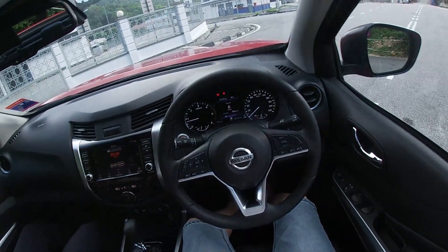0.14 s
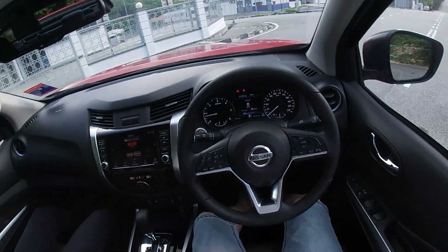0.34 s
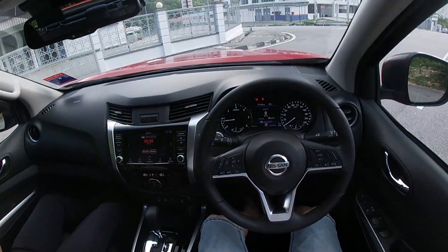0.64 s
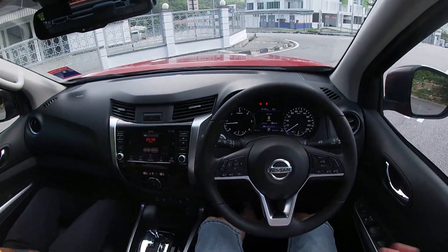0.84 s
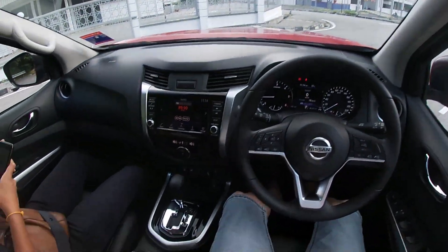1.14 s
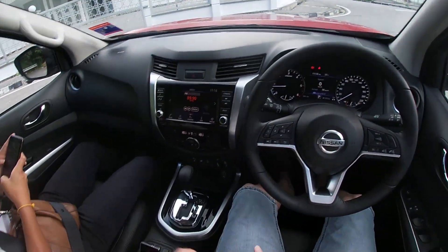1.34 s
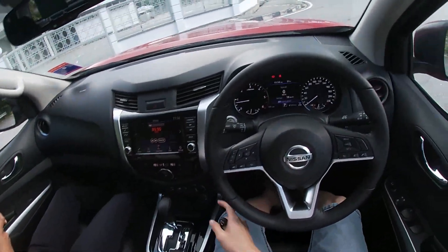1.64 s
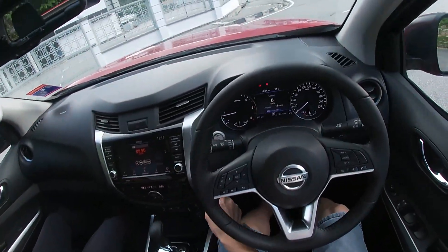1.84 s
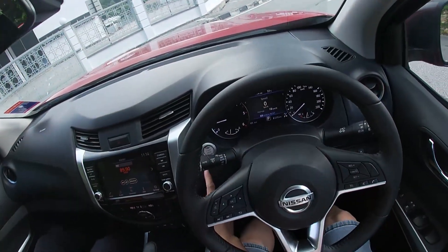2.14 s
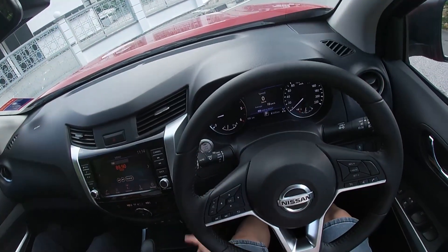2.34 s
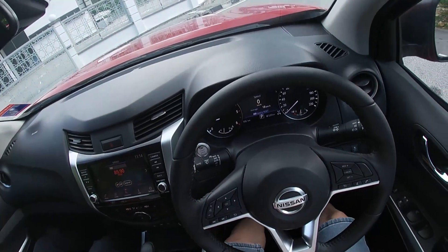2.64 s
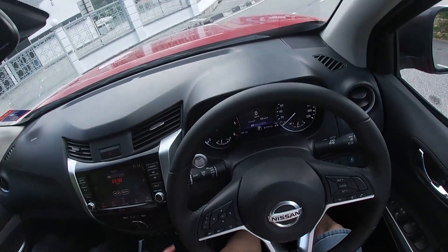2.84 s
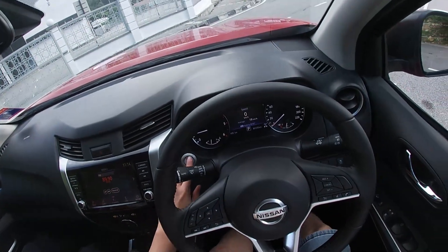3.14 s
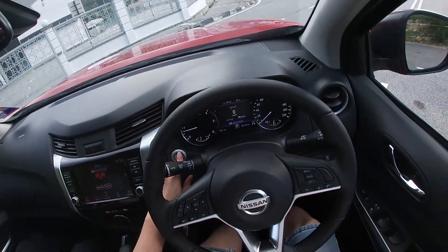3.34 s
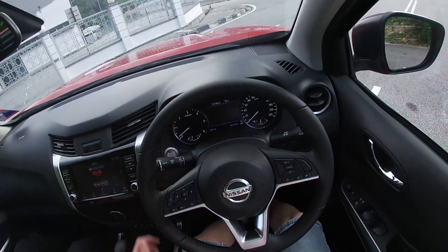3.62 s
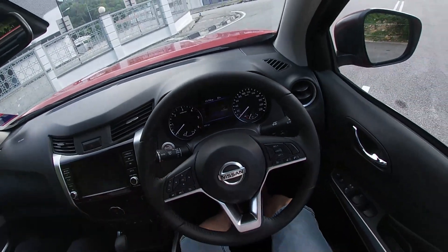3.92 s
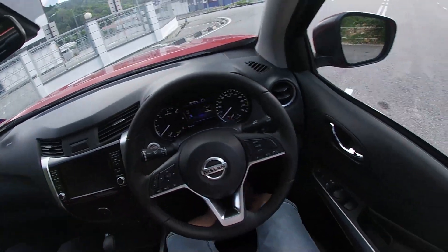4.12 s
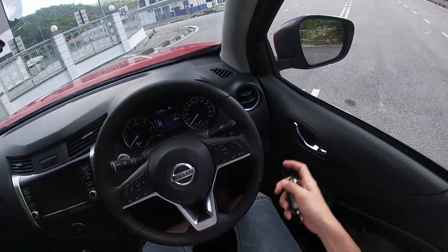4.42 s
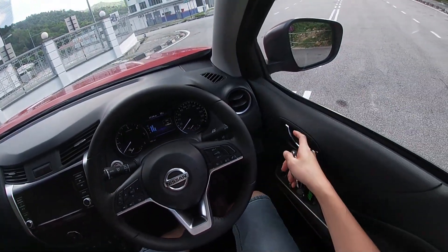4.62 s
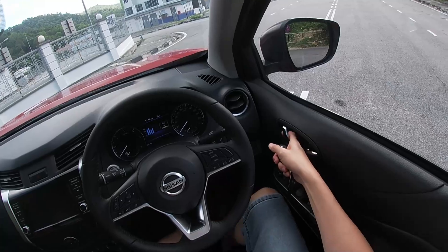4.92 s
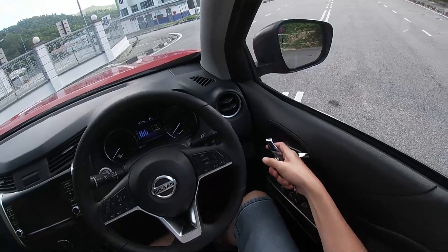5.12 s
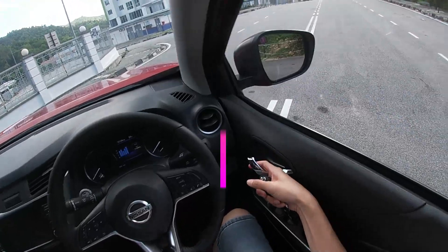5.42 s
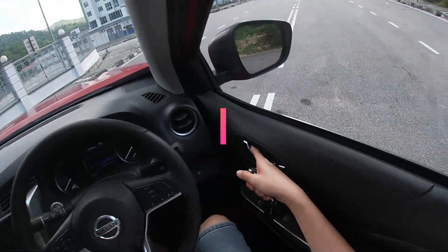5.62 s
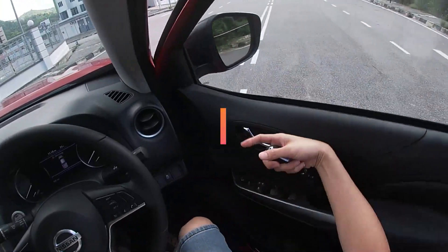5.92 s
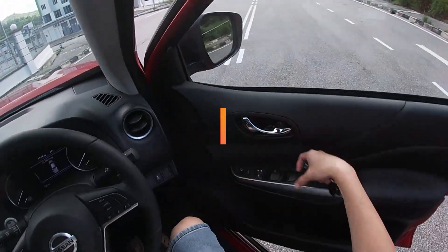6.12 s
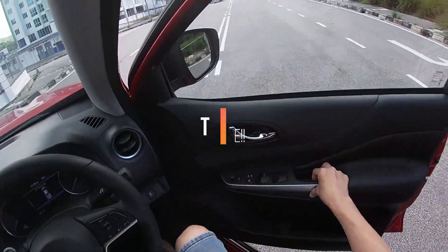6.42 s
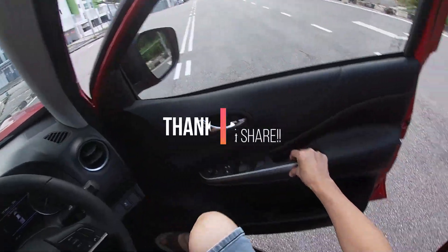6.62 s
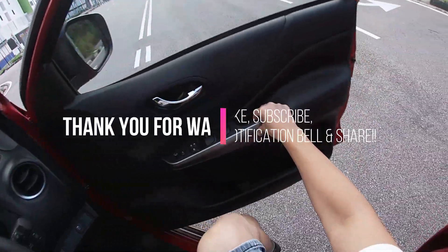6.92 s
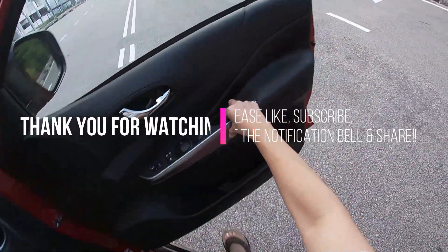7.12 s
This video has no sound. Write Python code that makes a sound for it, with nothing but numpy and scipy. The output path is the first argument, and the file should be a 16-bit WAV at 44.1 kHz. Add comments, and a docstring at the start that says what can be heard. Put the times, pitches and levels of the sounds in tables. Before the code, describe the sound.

From the driver's seat in a small, dry truck cabin, a four-cylinder diesel idles evenly, a deep boom pulsing about 25 times a second with soft muffled knock. Hiss and rumble rise and fall. Clicks come at once, with a tiny plastic creak at 0.15 s; stronger knocks and clicks cluster at 0.8-1.2 s, small ticks until 1.75. The boom softens from 1.6 to 2.2 s; a dull thud falls at 2.2. Clicks at 3.35 and 3.6 precede a lock clunk and brief whirr near 3.65. The engine cuts at 3.75, slows and shudders out by about 4.5. Quiet rubs and ticks follow. At 5.27 the latch releases with a heavy low thump; a short groan at 5.6, then rapid door thuds at 5.75-5.95. From 6.1 street noise opens and grows, with faint scrapes, a click and knock around 6.35, low wind gusts from 6.75 and a tiny falling chirp at 6.9.

```python
"""Inside a parked pickup a four-cylinder diesel idles amid clicks, dull knocks and short rubbing noises.
The engine is switched off, the locks spring open and the crank rocks to rest.
The door latch lets go, the door bumps free of its seal and the street air comes in.
The engine is a sum of firing orders with pulsed noise; struck parts are decaying modes with noise bursts;
creaks are stick-slip pulses in resonances or trembling tones, and rubs and air are coloured noise."""
import sys
import numpy as np
from scipy import signal
from scipy.fft import rfft, irfft, next_fast_len
from scipy.io import wavfile
from scipy.ndimage import uniform_filter1d

SR = 44100
rng = np.random.default_rng(int(sys.argv[2]) if len(sys.argv) > 2 else 0)


def log_audio(samples):
    """Write samples as a 16-bit WAV file to the path given in sys.argv[1]."""
    # one column per channel
    frames = np.atleast_2d(samples).T
    # limit to full scale, then quantise
    limited = np.clip(frames, -1, 1)
    pcm = np.round(limited * 32767).astype(np.int16)
    wavfile.write(sys.argv[1], SR, pcm)


N = 320607
T = np.arange(N) / SR
HIT_T = T[:SR // 2]  # time since a blow, s


def undb(db):
    """Logarithmic level: decibels to amplitude gain."""
    return 10 ** (np.asarray(db) / 20)


def unit(x):
    """Power normalisation: scale to rms 1."""
    return x / np.sqrt(np.mean(x ** 2))


def peak(x):
    """Peak normalisation: scale to peak 1."""
    return x / np.abs(x).max()


def colour(x, points):
    """Spectral shaping: filter by (Hz, dB) points joined along log frequency."""
    hz, db = np.transpose(points)
    size = next_fast_len(len(x))
    f = np.maximum(np.fft.rfftfreq(size, 1 / SR), 1)
    gain = undb(np.interp(np.log(f), np.log(hz), db))
    return irfft(rfft(x, size) * gain, size)[:len(x)]


def noise(points, size=N):
    """Random excitation: coloured noise of rms 1, so only the shape of the spectrum counts."""
    return unit(colour(rng.standard_normal(size), points))


def resonate(x, hz, width_hz):
    """Simple resonance: one second-order peak, gain 1 at its centre."""
    return signal.lfilter(*signal.iirpeak(min(hz, SR / 3), hz / width_hz, fs=SR), x)


def walk(rate):
    """Random modulation: new values at this rate in Hz joined by straight lines, rms near 1.4."""
    k = int(SR / rate)
    steps = np.repeat(rng.standard_normal(N // k + 1), k)[:N]
    return 1.7 * uniform_filter1d(steps, k)


def ramp(s, takes_s):
    """Linear transition: a straight rise from 0 to 1 that starts at time s."""
    return np.clip((T - s) / max(takes_s, .001), 0, 1)


def swell(s, length, attack_s, release_s):
    """Amplitude envelope: attack, hold until the length is over, release."""
    return ramp(s, attack_s) * (1 - ramp(s + length, release_s))


def fade(t60):
    """Exponential decay: the level falls 60 dB in t60 seconds."""
    return np.exp(-np.log(1000) * HIT_T / max(t60, .003))


def add(out, s, x):
    """Superposition: mix a sound in at time s."""
    i = max(int(s * SR), 0)
    out[i:i + len(x)] += x[:N - i]


# Crank speed. Each row: time in seconds, firing rate in Hz.
CRANK = [(0, 25.41), (1.2, 25.32), (2.4, 25.23), (3.72, 25.24), (3.89, 22.4), (3.98, 17), (4.6, 14)]
# Idle boom at firing orders 1 to 3. Each row: level in dB, change once the driver leans forward in dB.
BOOM = [(-36, -2), (-25, -6), (-38, 1.5)]
# Weaker firing orders. Each row: multiple of the firing rate, level in dB.
ORDERS = [(1.5, -49.5), (4, -46), (4.5, -55), (5, -55), (5.5, -56.5), (6, -52.5), (6.5, -57), (7, -48),
          (8, -58), (9, -58.5), (11, -64), (12, -62.5), (15, -65.5), (20, -64), (22, -63), (25, -69.5),
          (29, -66), (32, -69.5)]
# Diesel knock heard through the bulkhead. Each row: frequency in Hz, relative level in dB per Hz.
CLATTER = [(30, 2), (110, -2), (180, -4.5), (270, -9.5), (450, -13.5), (620, -13.5), (900, -23.5),
           (1250, -25), (1450, -26), (2500, -37.5), (5000, -43)]
LEAN_S, LEAN_TAKES_S = 1.59, 0.66  # the driver leans towards the start button
KEY_OFF_S, CUT_TAKES_S, COAST_DB = 3.74, 0.045, -12  # the fuel is cut and the engine coasts
STALL_S, STALL_DB_PER_S = 4.43, 86.5  # the last compression; the shaking dies away
FIRST_FIRING_S = .0266
STROKE_SCATTER_DB = 0.57  # per unit of wander: no two strokes weigh quite the same
WHINE_ORDER = 49  # gear whine, as a multiple of the firing rate
WHINE_DB, WHINE_FLUTTER_HZ = -65, 40  # backlash roughens the whine


def engine(knock_db=-42.5, scatter_db=-0.5):
    """Harmonic excitation: firings shake the cabin at multiples of their rate, with pulsed knock and gear whine."""
    s, hz = np.transpose(CRANK)
    rate = np.interp(T, s, hz)
    coast_db = COAST_DB * ramp(KEY_OFF_S, CUT_TAKES_S)
    effort = undb(coast_db - STALL_DB_PER_S * np.maximum(T - STALL_S, 0))
    lean = ramp(LEAN_S, LEAN_TAKES_S)
    angle = 2 * np.pi * (np.cumsum(rate) / SR - rate[0] * FIRST_FIRING_S)
    lurch = angle + 0.04 * walk(12.0)  # the block rocks unevenly on its mounts

    boom, drone = np.zeros(N), np.zeros(N)
    for order, (db, lean_db) in enumerate(BOOM, 1):
        level = undb(db + lean_db * lean + STROKE_SCATTER_DB * walk(25))
        boom -= level * np.sin(order * lurch)
    for order, db in ORDERS:
        drone += undb(db + 2 * walk(9)) * np.cos(order * angle + rng.uniform(0, 2 * np.pi))

    gate = unit(np.exp(.35 * np.cos(angle)) * undb(scatter_db * walk(25)))  # swells at each firing
    knock = undb(knock_db) * gate * noise(CLATTER)
    flutter = walk(WHINE_FLUTTER_HZ) + 1j * walk(WHINE_FLUTTER_HZ)
    whine = undb(WHINE_DB) * unit(np.real(flutter * np.exp(1j * WHINE_ORDER * angle)))
    return effort * (np.sqrt(2) * (boom + drone) + knock + whine)  # sqrt(2): sine levels are rms


# Stretches of louder hiss and low rumble. Each row: start in seconds, length in seconds, hiss in dB,
# rumble in dB.
SURGES = [(0.104, 0.52, -54, -42.5), (0.726, 0.4, -50.5, -46), (1.298, 1.09, -53.5, -65),
          (2.532, 0.52, -48.5, -65), (3.12, 0.67, -60.5, -47), (3.866, 0.74, -58, -46.5),
          (4.668, 0.52, -54, -48.5), (5.028, 0.49, -69, -37.5), (5.62, 0.4, -57, -39)]
# Spectrum of hiss, also used for short noises and the cabin's tail. Each row: frequency in Hz,
# relative level in dB per Hz.
HISS_COLOUR = [(200, 7), (700, 6), (1500, 2.5), (2600, 2), (4300, -0.5), (6000, 1), (7400, -1.5),
               (10000, -1), (15000, 3)]
# Spectrum of low rumble, also used for wind. Each row: frequency in Hz, relative level in dB per Hz.
RUMBLE_COLOUR = [(15, 0), (35, -7), (85, 3), (130, -2), (190, -4), (300, -16.5), (600, -30.5), (1500, -57)]
SURGE_ATTACK_S, SURGE_RELEASE_S = 0.054, 0.11
FLOOR_HISS_DB, FLOOR_RUMBLE_DB = -61.5, -50.5  # the closed cabin between the louder stretches


def cabin_noise(uneven_db=0.67, flicker_db=0.5):
    """Addition of powers: over a faint floor, the hiss and rumble rise and fall together."""
    hiss, rumble = undb(FLOOR_HISS_DB), undb(FLOOR_RUMBLE_DB)
    for s, length, hiss_db, rumble_db in SURGES:
        surge = swell(s, length, SURGE_ATTACK_S, SURGE_RELEASE_S)
        hiss = np.hypot(hiss, undb(hiss_db) * surge)
        rumble = np.hypot(rumble, undb(rumble_db) * surge)
    unevenness = undb(uneven_db * walk(8.8) + flicker_db * walk(60))
    return hiss * unevenness * noise(HISS_COLOUR) + rumble * noise(RUMBLE_COLOUR)


# Modes of the plastic catches. Each row: frequency in Hz, level in dB, t60 in seconds.
CATCH = [(434, -2.5, .07), (700, -13.5, 0.024), (883, 4, 0.024), (1009, 3.5, 0.023), (1228, -4, .04),
         (1348, 0.5, 0.038), (1541, 2.5, 0.031), (1800, -6, 0.042), (2110, -0.5, 0.029), (2588, -2, 0.057),
         (3085, 1, 0.042), (3785, -4, 0.034), (4600, 1, .045), (6560, 3.5, .04)]


def catch(body_hz, focus_db):
    """Modal vibration: a plastic catch rings, losing focus_db per octave away from its own pitch."""
    tone = np.zeros(len(HIT_T))
    for hz, db, t60 in CATCH:
        level = undb(db - focus_db * abs(np.log2(hz / body_hz)))
        detuned_hz = hz * (1 + 0.014 * rng.standard_normal())
        phase = rng.uniform(0, 2 * np.pi)
        tone += level * fade(t60) * np.sin(2 * np.pi * detuned_hz * HIT_T + phase)
    return peak(tone)


# Sharp clicks of switches and catches. Each row: start in seconds, peak of the scatter in dB,
# body in dB relative to the scatter, Hz that the scatter favours, t60 in seconds, Hz that the body favours.
CLICKS = [(0.031, -16.5, 7.5, 4800, 0.043, 930), (0.079, -34, -12, 4500, 0.044, 4500),
          (.092, -31.5, -1, 4140, 0.06, 1390), (0.378, -27, -1, 6560, 0.052, 1400),
          (0.381, -28.5, 4, 3760, 0.061, 1050), (0.8468, -17.5, -5.5, 3900, 0.071, 3800),
          (.972, -25, -13, 3540, 0.031, 3700), (.990, -22.5, -6, 4960, 0.052, 1900),
          (1.128, -44, 9, 1000, .03, 900), (1.141, -45, 11, 1200, .03, 1100),
          (1.152, -30, -7, 6560, 0.046, 1200), (1.168, -32.5, -5, 3000, 0.035, 2500),
          (1.178, -24.5, -14, 8300, 0.049, 4500), (1.408, -31.5, -5, 3340, 0.085, 3200),
          (1.565, -34.5, -6, 3100, 0.074, 3100), (1.596, -33.5, -7, 2930, 0.048, 3000),
          (1.627, -43, -8, 3100, 0.039, 3000), (1.647, -40, -11, 3100, 0.034, 3000),
          (1.751, -33, -26, 7150, 0.12, 6500), (2.485, -40.5, -18, 5350, 0.2, 5000),
          (3.337, -43, -5, 5500, 0.031, 1500), (3.359, -36, -4, 6500, 0.055, 1200),
          (3.546, -43.5, 10, 1500, 0.044, 1410), (3.623, -29.5, -5, 7440, 0.11, 1500),
          (3.645, -34.5, 4, 2000, 0.056, 1300), (3.926, -34.5, 3, 6850, 0.039, 1410),
          (3.929, -45, 0, 4500, 0.046, 2780), (4.128, -40.5, -3, 800, .05, 800),
          (5.073, -36.5, -9, 1500, 0.046, 800), (5.104, -38, -2, 5000, .05, 1400),
          (5.121, -35, -5, 5000, 0.054, 1500), (5.266, -33.5, 9.5, 2000, 0.045, 1250),
          (5.316, -35.5, 6, 2300, 0.025, 1500), (5.477, -22.5, -20, 7750, 0.042, 1090),
          (5.746, -34, -7, 5040, 0.035, 1900), (5.871, -42.5, -2, 5950, 0.076, 1400),
          (6.177, -37, 4, 1700, 0.061, 1300), (6.332, -36, 6, 1900, 0.045, 1900),
          (6.351, -29, -2.5, 3700, 0.024, 3670)]
# Spectrum of the bright scatter. Each row: frequency in Hz, relative level in dB per Hz.
CLICK_COLOUR = [(500, -27), (1200, -5), (2200, 0.5), (3100, 5), (4000, 1.5), (4800, -3), (5600, 2.5),
                (7200, -2.5), (9000, -2), (15000, -3.5)]
# Spectrum of contact noise, also used by crack(). Each row: frequency in Hz, relative level in dB per Hz.
CRACK_COLOUR = [(150, 3.5), (600, -3), (1150, -7.5), (1900, -15), (2900, -12.5), (4500, -16), (7000, -17.5),
                (14000, -36)]


def clicks(snap_db=3, snap_t60=0.003, grit_db=-9, focus_db=6, sharpness=2.5, body_focus_db=8.5):
    """Impulsive excitation: a hard snap, a bright scatter coloured by the part, and the modes of the catch."""
    out = np.zeros(N)
    for s, db, body_db, hz, t60, body_hz in CLICKS:
        decay = fade(t60) + undb(snap_db) * fade(snap_t60)
        burst = noise(CLICK_COLOUR, len(HIT_T)) * decay
        tick = peak(burst + undb(focus_db) * resonate(burst, hz, hz / sharpness))
        grit = peak(noise(CRACK_COLOUR, len(HIT_T)) * fade(t60))
        body = peak(catch(body_hz, body_focus_db) + undb(grit_db) * grit)
        add(out, s, undb(db) * (tick + undb(body_db) * body))
    return out


def cabin(x, wet_db=-10, t60=0.12):
    """Reverberation: glass and upholstery return a very short diffuse tail."""
    tail = noise(HISS_COLOUR, len(HIT_T)) * fade(t60) * (HIT_T > .003)
    return x + undb(wet_db) * signal.fftconvolve(x, tail / np.linalg.norm(tail))[:N]


def ring(modes):
    """Modal superposition: struck (Hz, dB, t60) modes, slightly detuned at each blow."""
    detune = 1 + 0.017 * rng.standard_normal(len(modes))
    tone = np.zeros(len(HIT_T))
    for (hz, db, t60), d in zip(modes, detune):
        tone += undb(db) * fade(t60) * np.sin(2 * np.pi * hz * d * HIT_T)
    return tone


def softened(x, load_s=0.0025):
    """Compliant contact: a yielding surface takes a moment to load; the peak is 1."""
    return peak(x * (1 - np.exp(-HIT_T / load_s)))


def blow(modes, spot_hz, t60, focus_db):
    """Selective excitation: modes lose focus_db per octave away from the pitch of the struck spot."""
    struck = [(hz, db - focus_db * abs(np.log2(hz / spot_hz)), share * t60) for hz, db, share in modes]
    return softened(ring(struck))


def crack(muffle_hz, t60):
    """Low-pass contact: the muffled burst of noise of a hard contact."""
    burst = noise(CRACK_COLOUR, len(HIT_T)) * fade(t60)
    muffle = signal.butter(2, min(muffle_hz, SR / 3), fs=SR)
    return softened(signal.lfilter(*muffle, burst))


# Dull knocks: trim, the locks releasing near 3.67 s, the engine stalling near 4.3 s. Each row:
# start in seconds, peak of the ringing in dB, crack in dB relative to it, Hz that the struck spot favours,
# thud in dB relative to the ringing, Hz that the thud favours.
KNOCKS = [(.036, -27.5, -14, 300, 7, 230), (.882, -11, -5.5, 583, 1, 250), (.892, -17, -11, 427, -0.5, 240),
          (1.083, -11.5, -1.5, 550, 3.5, 176), (1.103, -16, -17, 280, -17, 200),
          (1.125, -23, -1, 402, -2, 190), (2.228, -29, -11, 313, 7, 165), (3.36, -24.5, -22, 348, -6, 200),
          (3.647, -23, 1.5, 526, -12, 140), (3.673, -18, 1.5, 640, -9, 90),
          (3.684, -21, -3, 515, -0.5, 134), (4.136, -33, -5.5, 218, -9, 130),
          (4.244, -28, -27, 227, -7, 150), (4.315, -39, -8, 700, -14, 300),
          (4.372, -21.5, -31, 184, -1.5, 87.6), (4.728, -46.5, -26, 200, 10.5, 114),
          (5.081, -24.5, -9, 195, -22, 153), (5.19, -27, -20, 280, -15, 200),
          (6.352, -29, 6, 613, 1.5, 230), (6.485, -30, -15, 190, -2, 165)]
# Modes of trim panels and cabin air. Each row: frequency in Hz, level in dB, t60 as a share of the knock's.
PANEL = [(89, -4, 1.9), (124.2, -2.5, 3.9), (159.4, 4, 1.44), (194.7, -1.5, 0.88), (263.6, -1, 0.74),
         (304, -3.5, 0.74), (341, -2.5, 0.56), (399, -10, 0.81), (442, -8.5, 0.74), (543, -7, 0.44),
         (601, -19.5, 0.5), (830, -26.5, 0.33)]
KNOCK_T60_S = 0.074
THUD_LAG_S, THUD_T60_S = 0.00408, 0.086  # the thud comes just after the contact


def knocks(focus_db=13.5, muffle_ratio=4.35, crack_t60=0.047):
    """Panel vibration: each knock rings the panel modes, with brighter cracks at higher pitches, then a thud."""
    out = np.zeros(N)
    for s, db, crack_db, spot_hz, thud_db, thud_hz in KNOCKS:
        ringing = blow(PANEL, spot_hz, KNOCK_T60_S, focus_db)
        contact = ringing + undb(crack_db) * crack(muffle_ratio * spot_hz, crack_t60)
        add(out, s, undb(db) * contact)
        thud = blow(PANEL, thud_hz, THUD_T60_S, focus_db)
        add(out, s + THUD_LAG_S, undb(db + thud_db) * thud)
    return out


# A short plastic creak. Each row: start in seconds, length in seconds, level in dB.
CREAK = [(.142, 0.03, -33.5), (.181, 0.0059, -33.5)]
# Resonances of the creak. Each row: frequency in Hz, nominal width in Hz, level in dB.
CREAK_MODES = [(1090, 140, -1), (1534, 59, 5.5), (2330, 98, -1.5)]
# The door stay scrapes as it swings. Each row: start in seconds, length in seconds, level in dB.
STAY = [(6.175, 0.018, -42), (6.217, 0.02, -48.5), (6.255, 0.077, -60), (6.33, 0.062, -44)]
# Resonances of the door stay. Each row: frequency in Hz, nominal width in Hz, level in dB.
STAY_MODES = [(594, 120, 7), (1350, 220, 0), (1850, 110, 0), (3360, 190, -7), (4850, 260, -10),
              (9960, 50, -10)]
SLIP_ATTACK_S, SLIP_RELEASE_S = 0.0087, 0.013  # creaks and gliding tones start and stop this quickly


def creak(strokes, modes, slip_hz, jitter):
    """Stick-slip friction: a part slips in quick uneven steps that ring its resonances."""
    steps = np.floor(np.cumsum(slip_hz * np.exp(jitter * walk(200))) / SR)
    pulses = np.diff(steps, prepend=0)
    tone = np.zeros(N)
    for hz, width_hz, db in modes:
        once = resonate(pulses, hz, 2 * width_hz)
        tone += undb(db) * resonate(once, hz, 2 * width_hz)  # twice through, for steeper skirts
    level = sum(undb(db) * swell(s, length, SLIP_ATTACK_S, SLIP_RELEASE_S) for s, length, db in strokes)
    return unit(tone) * level


# Short band-limited noises: rubs, and a lock motor's whirr near 3.65 s. Each row: start in seconds,
# length in seconds, level in dB, centre in Hz, width in Hz.
SHORT_NOISES = [(0.263, 0.075, -54, 1050, 400), (0.746, 0.11, -51, 1110, 1010),
                (0.798, 0.055, -48, 5950, 6000), (0.968, 0.15, -45, 1280, 800),
                (1.007, 0.11, -53.5, 3300, 2500), (1.105, .05, -52, 1800, 1800),
                (1.757, 0.052, -54, 5500, 5000), (2.559, 0.27, -54, 5400, 4500),
                (2.828, 0.16, -53.5, 4460, 4000), (2.96, 0.15, -51.5, 7500, 5000),
                (2.225, .035, -57, 900, 130), (3.509, 0.074, -52.5, 1420, 400),
                (3.511, 0.044, -53, 7000, 3500), (3.651, 0.058, -41.5, 1890, 2380),
                (3.654, .05, -39, 495, 250), (4.004, 0.074, -65, 750, 300), (4.118, 0.085, -63, 760, 300),
                (4.44, 0.16, -61, 1470, 905), (4.534, 0.035, -59.5, 750, 800),
                (4.57, 0.12, -66.5, 1171, 400), (4.9, 0.17, -67, 1100, 600),
                (5.103, 0.048, -45, 1180, 1180), (5.174, 0.059, -52.5, 1530, 1600),
                (5.266, 0.062, -48, 1990, 2500), (5.461, 0.052, -48.5, 850, 600),
                (5.579, 0.11, -64, 1150, 800), (5.672, 0.069, -54, 750, 807),
                (5.858, 0.037, -53, 2200, 1500), (5.927, 0.066, -56.5, 2000, 1600),
                (6.174, 0.033, -50.5, 2000, 2600), (6.217, 0.024, -56, 3000, 3000),
                (6.325, 0.033, -50, 2420, 2440)]


def short_noises(grain_db=2.0, edges_s=0.054):
    """Band-limited noise: each rub or whirr swells and dies through one resonance, with a fast uneven grain."""
    out = np.zeros(N)
    grains = noise(HISS_COLOUR) * undb(grain_db * walk(250))
    for s, length, db, hz, width_hz in SHORT_NOISES:
        i, n = int(s * SR), int(length * SR)
        envelope = signal.windows.tukey(n, min(edges_s / length, 1))  # both edges together last edges_s
        add(out, s, undb(db) * unit(resonate(grains[i:i + n], hz, width_hz) * envelope))
    return out


# Gliding trembling tones: creaks, groans, and a falling chirp near 6.9 s, perhaps a bird. Each row:
# start in seconds, length in seconds, level in dB, first pitch in Hz, last pitch in Hz, tremble rate in Hz.
GLIDES = [(0.787, 0.043, -41.5, 540, 676, 179.8), (.79, 0.049, -50, 1380, 1750, 300),
          (1.031, 0.035, -48, 1360, 1700, 508), (1.125, 0.027, -40, 901, 1170, 498),
          (4.313, 0.024, -43, 579, 545, 45), (5.57, 0.17, -51.5, 415, 557, 420),
          (6.179, 0.031, -49, 760, 540, 200), (6.216, 0.028, -47.5, 734, 600, 68.5),
          (6.283, 0.071, -57, 1960, 1880, 40), (6.194, 0.07, -61, 3250, 3420, 45.2),
          (6.32, 0.058, -54, 3420, 3290, 45.1), (6.225, .11, -66, 4760, 4600, 40.2),
          (6.891, .04, -50.5, 3080, 2580, 383)]


def glide(s, length, db, first_hz, last_hz, tremble_hz):
    """Amplitude and phase modulation: a tone on a gliding pitch whose strength and phase tremble."""
    hz = first_hz + (last_hz - first_hz) * ramp(s, length)
    tremble = 1 + walk(tremble_hz) + 1j * walk(tremble_hz)
    tone = unit(np.real(tremble * np.exp(2j * np.pi * np.cumsum(hz) / SR)))
    return undb(db) * tone * swell(s, length, SLIP_ATTACK_S, SLIP_RELEASE_S)


# The last compressions throw the block about on its mounts. Each row: start in seconds, peak in dB,
# frequency in Hz, t60 in seconds.
SHUDDERS = [(3.89, -35, 11, .25), (3.953, -25.5, 36, 0.45), (4.005, -28, 16, 0.35),
            (4.072, -25, 22.5, 0.34), (4.13, -23, 12.3, 0.33), (4.203, -23, 22, .25),
            (4.246, -23, 33, 0.53), (4.311, -25, 30.4, 0.44), (4.48, -34, 33, 0.4)]
# Slow pressure swings as the door moves. Each row: start in seconds, peak in dB, frequency in Hz, t60 in seconds.
SWINGS = [(5.279, -11, 7.6, 0.87), (5.341, -15, 33, 0.34), (5.741, -16, 38.4, 0.34),
          (5.804, -9.5, 44, 0.44), (5.989, -20.5, 41, 0.16)]


def swings(table, rise_s=0.0066):
    """Damped oscillation: a heavy part lurches and pumps the cabin air."""
    out = np.zeros(N)
    for s, db, hz, t60 in table:
        push = 1 - np.exp(-(HIT_T / rise_s) ** 2)
        add(out, s, undb(db) * peak(push * fade(t60) * np.sin(2 * np.pi * hz * HIT_T)))
    return out


# Blows as the latch lets go and the door judders out of its seal. Each row: start in seconds,
# peak of the ringing in dB, contact in dB relative to it, Hz that the blow favours, t60 in seconds,
# Hz above which the seal muffles the contact.
DOOR_BLOWS = [(5.26, -16, -30, 101, .082, 298), (5.268, -8, -13, 425, 0.1, 1200),
              (5.278, -7, -19, 290, 0.087, 700), (5.288, -8.5, -4, 200, 0.06, 800),
              (5.304, -7, -5.5, 115, 0.12, 600), (5.742, -21.5, -21, 260, 0.099, 900),
              (5.753, -15, -14, 126, 0.085, 700), (5.78, -18.5, -21, 151, 0.084, 600),
              (5.841, -14.5, -30, 110, .05, 200), (5.849, -16.5, 1, 172, 0.051, 1280),
              (5.857, -6.5, -10, 151, 0.039, 1300), (5.864, -12.5, -18, 129, .06, 297),
              (5.873, -6.5, -24, 180, .08, 700), (5.879, -12, -23, 280, 0.032, 500),
              (5.886, -9, -7.5, 300, 0.0345, 1100), (5.9, -9.5, -8, 197, 0.034, 1400),
              (5.94, -23.5, -15.5, 180, 0.05, 503)]
# Modes of the door. Each row: frequency in Hz, level in dB, t60 as a share of the blow's.
DOOR = [(51.4, -6.5, 0.82), (90.4, 9.5, 0.85), (117, 5.5, 0.82), (165.6, 6, 0.8), (195.6, 4, 0.8),
        (239, 0, 0.81), (280, 2.5, 0.74), (323, -9.5, 0.82), (440, -3, 0.95), (522, -14.5, 0.94),
        (600, -19, 0.64), (782, -19, 0.71)]


def judders(focus_db=9.0, crack_t60=0.012, contact_s=0.00076, grit_db=-7):
    """Impact through a compliant seal: the door slips in uneven blows, each a short push that rings it."""
    out = np.zeros(N)
    press = HIT_T / contact_s
    push = peak(press * np.exp(-press) * (1 - press / 2))  # push, then recoil
    for s, db, contact_db, hz, t60, muffle_hz in DOOR_BLOWS:
        seal = signal.butter(4, min(muffle_hz, SR / 3), fs=SR)
        grit = undb(grit_db) * crack(muffle_hz, crack_t60)
        contact = peak(signal.lfilter(*seal, push + grit))
        add(out, s, undb(db) * (blow(DOOR, hz, t60, focus_db) + undb(contact_db) * contact))
    return out


# Spectrum of street noise. Each row: frequency in Hz, relative level in dB per Hz.
STREET_COLOUR = [(60, 6.5), (200, 3), (350, 4), (600, -5), (1000, -8.5), (1500, -11), (3100, -10.5),
                 (4300, -16), (5800, -18.5), (6800, -34), (8500, -27), (15000, -13.5)]
# Gusts through the widening gap. Each row: start in seconds, length in seconds, level in dB.
GUSTS = [(6.743, 0.045, -35), (6.88, 0.056, -31.5), (7.023, 0.077, -35), (7.167, .09, -31)]
# Spectrum of the gusts. Each row: frequency in Hz, relative level in dB per Hz.
GUST_COLOUR = [(15, 2), (45, -0.5), (82, 8), (125, -2), (190, -2.5), (300, -43), (600, -30), (1500, -43)]
GUST_ATTACK_S, GUST_RELEASE_S = 0.017, 0.05
OPEN_S, OPEN_TAKES_S = 6.087, 0.066  # the door clears its frame
STREET_DB, STREET_DB_PER_S = -46, 8.5  # street noise grows as the gap widens
WIND_S, WIND_TAKES_S = 6.46, 0.23  # a gusty draught reaches the seat
WIND_DB, GUST_DB = -41, 1  # its level, and its change per unit of wander


def air(flicker_db=-0.35):
    """Transmission through an opening: cabin hiss and rumble give way to street noise and wind."""
    gap = ramp(OPEN_S, OPEN_TAKES_S)
    since = np.maximum(T - OPEN_S, 0)
    street = noise(STREET_COLOUR) * undb(STREET_DB + STREET_DB_PER_S * since + flicker_db * walk(27))
    wind = noise(RUMBLE_COLOUR) * undb(WIND_DB + GUST_DB * walk(12)) * ramp(WIND_S, WIND_TAKES_S)
    gust_level = sum(undb(db) * swell(s, length, GUST_ATTACK_S, GUST_RELEASE_S) for s, length, db in GUSTS)
    gusts = noise(GUST_COLOUR) * gust_level
    return (1 - gap) * cabin_noise() + gap * (street + wind + gusts)


def scene():
    """Linear superposition: engine, clicks, knocks, door and air, heard from the driver's seat."""
    plastic_creak = creak(CREAK, CREAK_MODES, slip_hz=256.4, jitter=0.18)
    stay_scrape = creak(STAY, STAY_MODES, slip_hz=403, jitter=0.29)
    small_sounds = cabin(clicks() + knocks() + short_noises() + plastic_creak + stay_scrape)
    glides = sum(glide(*row) for row in GLIDES)
    door = cabin(judders(), wet_db=-14, t60=0.071) + swings(SWINGS)
    return (engine() + swings(SHUDDERS) + small_sounds + door + glides + air())[None]


# The microphone behind its wind screen. Each row: frequency in Hz, gain in dB.
MICROPHONE = [(7400, -0.5), (8400, -10), (10000, -16), (12000, -28.5), (15000, -38.5)]
TOP_HZ = 15100


def record(dry):
    """Saturation and band limiting: the microphone rounds the loudest peaks and dulls the treble; the top is cut."""
    ceiling = .7
    rounded = ceiling * np.tanh(dry[0] / ceiling)
    heard = colour(rounded, MICROPHONE)
    return signal.sosfilt(signal.ellip(8, .2, 70, TOP_HZ, fs=SR, output="sos"), heard)[None]


dry = scene()
out = record(dry)
log_audio(out)
```